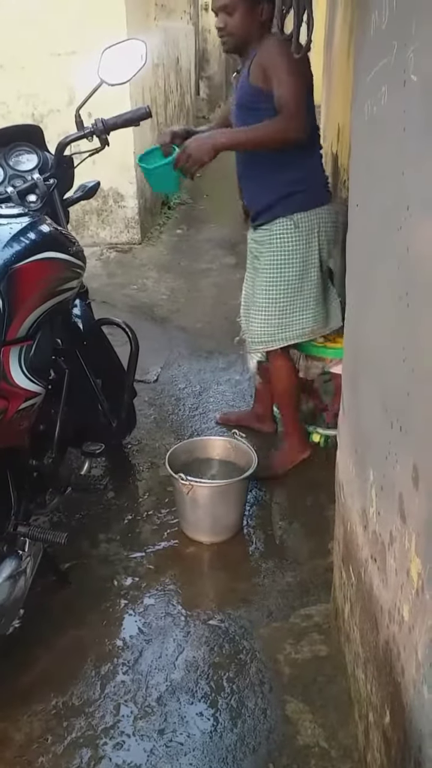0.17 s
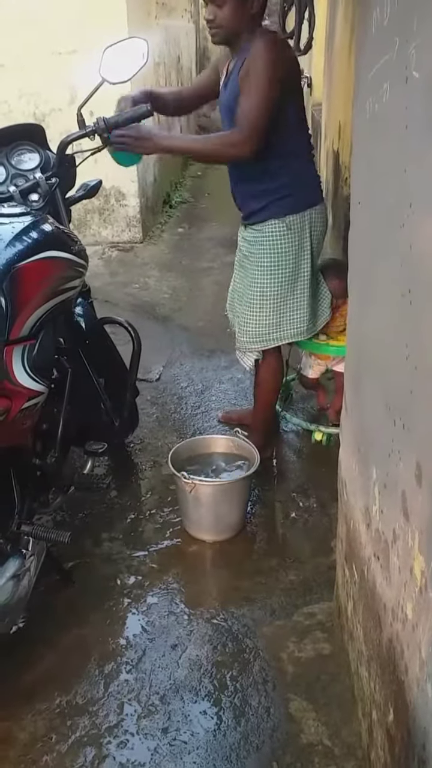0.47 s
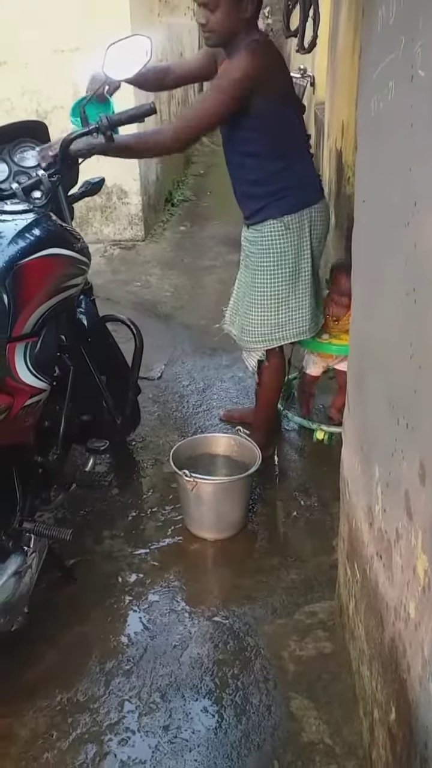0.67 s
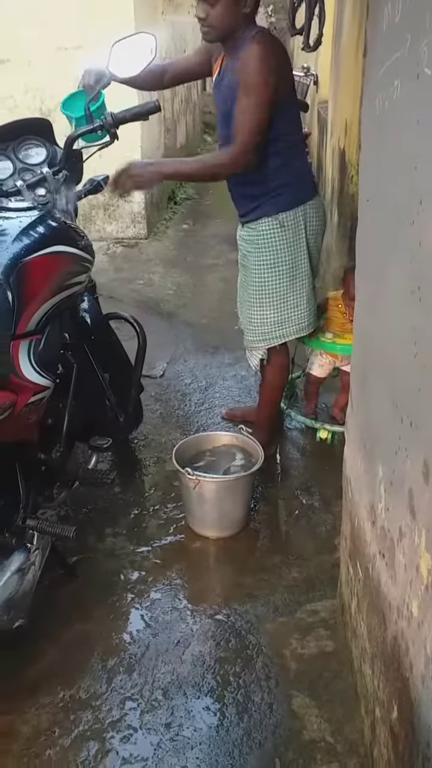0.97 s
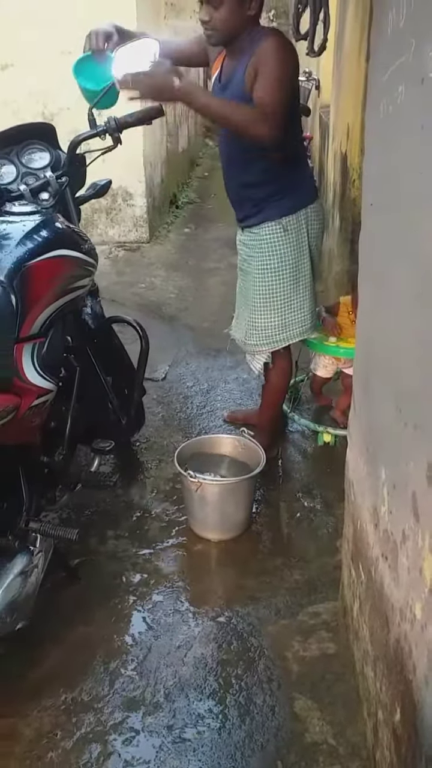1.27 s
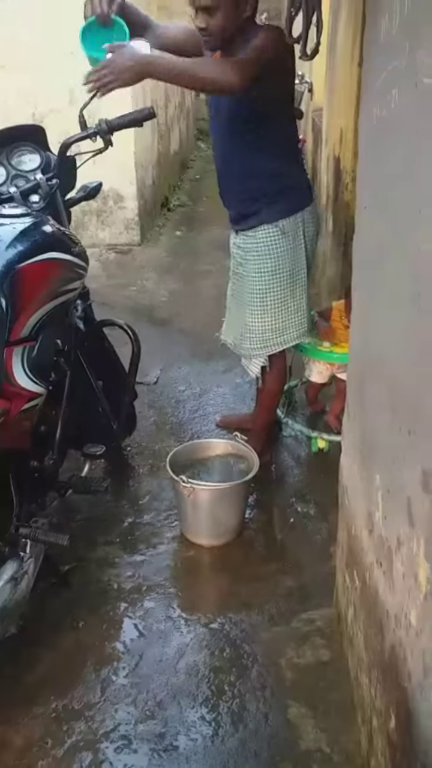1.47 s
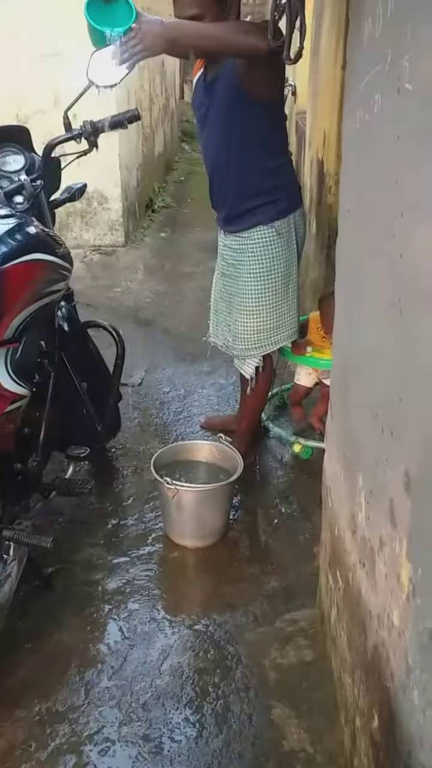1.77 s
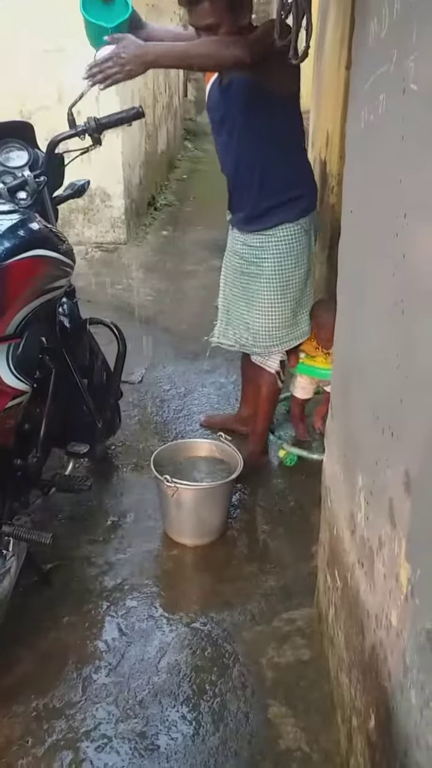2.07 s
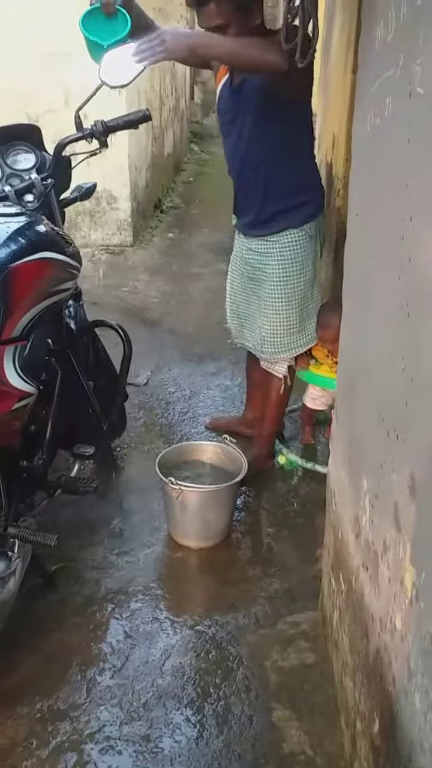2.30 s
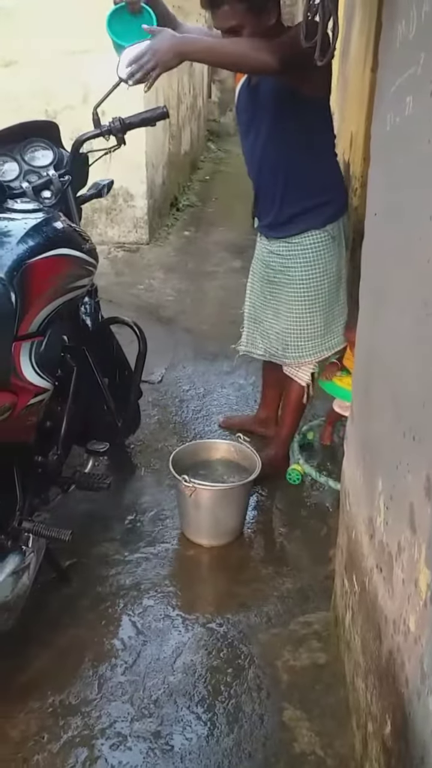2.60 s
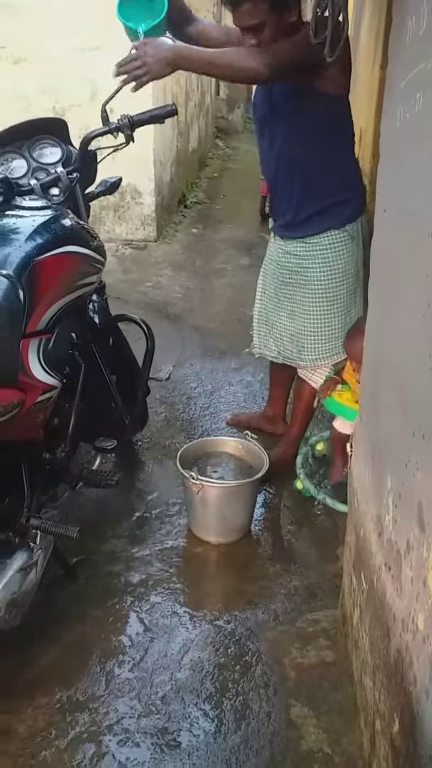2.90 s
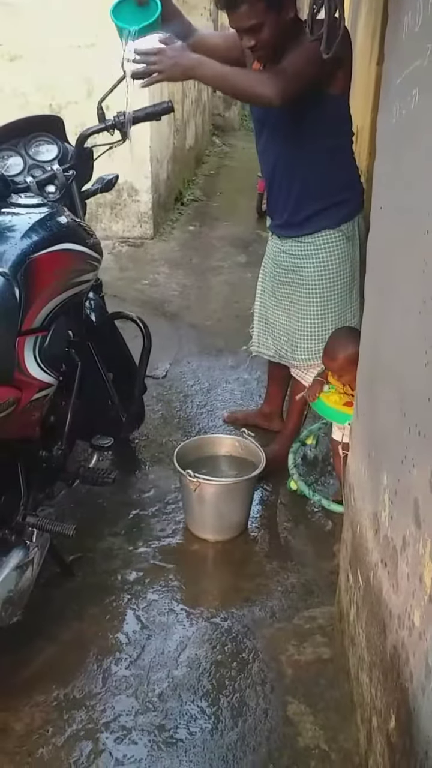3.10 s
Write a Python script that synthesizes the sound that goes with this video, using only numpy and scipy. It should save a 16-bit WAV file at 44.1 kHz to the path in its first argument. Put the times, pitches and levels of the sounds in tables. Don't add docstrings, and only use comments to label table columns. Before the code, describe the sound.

Close phone pickup of water poured over a motorcycle in a tight alley: faint spitting first, a plastic double knock with rattle, then dense bright splashes with wet rubbing, gurgles and short squeaks over a low murmur.

```python
import sys
import numpy as np
from scipy import signal
from scipy.fft import rfft, irfft, next_fast_len
from scipy.io import wavfile
from scipy.ndimage import map_coordinates

SR = 44100
rng = np.random.default_rng(int(sys.argv[2]) if len(sys.argv) > 2 else 0)


def natural_amplitude(level_db):
    exponent = np.asarray(level_db, float) / 20
    return 10 ** exponent


def store_pcm(level_fs):
    pcm = np.round(np.clip(level_fs, -1, 1) * 32767).astype(np.int16)
    wavfile.write(sys.argv[1], SR, np.atleast_2d(pcm).T)


N = 143325


def unit(x):
    return x / np.sqrt(np.mean(x ** 2) + 1e-20)


def along(points, hz):
    f, v = np.transpose(points)
    return np.interp(np.log(hz + 1), np.log(f + 1), v)


def wobble(knots_per_s, size=N):
    knots = rng.standard_normal(int(size * knots_per_s / SR) + 4)
    return map_coordinates(knots, [np.arange(size) * knots_per_s / SR])


def filtered(x, response):
    m = next_fast_len(len(x) + 2048)
    return irfft(rfft(x, m) * response(np.fft.rfftfreq(m, 1 / SR)), m)[:len(x)]


def add(track, start_s, sound):
    part = track[max(round(start_s * SR), 0):][:len(sound)]
    part += sound[:len(part)]


def swell(length_s, rise_share):
    u = np.linspace(0, 1, max(round(length_s * SR), 8))
    return np.clip(np.minimum(u / rise_share, (1 - u) / (1 - rise_share)) * 4.539, 0, 1)


# freq_hz, density_db_per_hz
STREET_SPECTRUM = [(18, -55), (30, -1.5), (239, 2), (303, 2.5), (486, 0), (721, 4), (1630, -23.5),
                   (3770, 3.5), (16000, -53)]
# peak_s, peak_db, pitch_hz
THUDS = [(0.125, -41.5, 321.7), (0.199, -40.5, 345.6), (0.239, -33, 372.5), (0.289, -47.5, 325.9),
         (0.335, -41, 407.1), (0.365, -40, 309.5), (0.469, -40.5, 317.3), (0.517, -39, 300.2),
         (0.641, -39.5, 320.6), (0.698, -40, 369), (0.984, -39, 365), (1.144, -47.5, 305.2),
         (1.189, -40, 312.6), (1.34, -41, 289.1), (1.412, -34, 306.8), (1.538, -37.5, 316.9),
         (1.593, -37, 303.5), (1.751, -41.5, 329.9), (1.923, -42, 319.1), (1.96, -39, 340),
         (2.051, -36.5, 320.8), (2.509, -41, 359.7), (2.605, -44.5, 293.6), (2.635, -35, 296),
         (2.866, -39.5, 338.5), (3.141, -37.5, 390.4)]


def street():
    level_db, rise_db_per_s = -50.5, 2
    hum_hz, hum_width_hz, hum_db = 322.18, 112.38, -53
    thud_db, thud_rise_s, thud_t60_s = 9.5, 0.0059386, 0.07952

    def hollow(f):
        damping = 1j * f * hum_width_hz
        return (damping / (hum_hz ** 2 - f * f + damping)) ** 2

    murmur = unit(filtered(rng.standard_normal(N), lambda f: natural_amplitude(along(STREET_SPECTRUM, f))))
    murmur *= natural_amplitude(level_db + rise_db_per_s * np.arange(N) / SR + 0.641 * wobble(6.4634))
    out = murmur + natural_amplitude(hum_db) * unit(filtered(rng.standard_normal(N), hollow))
    t = np.arange(SR // 10) / SR
    for peak_s, db, hz in THUDS:
        envelope = natural_amplitude(db + thud_db - 60 * t / thud_t60_s) * (1 - np.exp(-t / thud_rise_s)) ** 2
        add(out, peak_s - thud_rise_s, envelope * np.sin(2 * np.pi * hz * t))
    return out


# freq_hz, t60_s
ALLEY_DECAY = [(300, 0.4794), (2000, 0.18982), (6000, 0.09191), (15000, 0.25513)]


def alley(x):
    tail_db, delay_s = -3, 0.0017
    out, step = np.zeros(N), SR // 10
    for at in range(0, N, step):
        hz, t, z = signal.stft(rng.standard_normal(SR // 3), SR, nperseg=128)
        decay = natural_amplitude(-60 * t / along(ALLEY_DECAY, hz)[:, None])
        tail = signal.istft(z * decay, SR, nperseg=128)[1]
        tail /= np.linalg.norm(tail)
        add(out, at / SR + delay_s, natural_amplitude(tail_db) * signal.fftconvolve(x[at:at + step], tail))
    return out


# start_s, peak_db
KNOCK_EVENTS = [
    (.779, -17),
    (.786, -12),
    (.814, -21),
    (.858, -24),
]
# freq_hz, level_db, t60_s, rise_s
SHELL_MODES = [(378, 7, .16, .009), (507.43, -8.5, 0.1354, 0.00183), (517, -9, 0.3752, 0.00611),
               (590, 0, .035, 0.000627), (716, -4.5, 0.05244, 0.000841), (830.05, -8, 0.09187, 0.001657),
               (1353.8, 0, .03, 0.00052)]


def walker():
    rattle_hz, rattle_db, rattle_t60_s = 900, -8, 0.5615
    body_hz, body_db, body_t60_s = 549.8, -5.5, 0.2564

    def rattle_band(f):
        low_cut = (f / rattle_hz) ** 2 / (1 + (f / rattle_hz) ** 2)
        return low_cut / (1 + (f / 4500) ** 3)

    def body_band(f):
        return 1 / (1 + (1.683 * (f / body_hz - body_hz / (f + 1))) ** 4)

    out, t = np.zeros(N), np.arange(SR // 3) / SR
    onset = 1 - np.exp(-t / 0.00141)
    for start_s, db in KNOCK_EVENTS:
        ring = np.zeros(len(t))
        for hz, level_db, t60_s, rise_s in SHELL_MODES:
            envelope = natural_amplitude(level_db - 60 * t / t60_s) * (1 - np.exp(-t / rise_s))
            ring += envelope * np.sin(2 * np.pi * hz * (start_s + t))
        loose = rng.standard_normal((2, len(t))) * natural_amplitude(2.5 * wobble(203, len(t)))
        rattle = natural_amplitude(rattle_db - 60 * t / rattle_t60_s) * unit(filtered(loose[0], rattle_band))
        body = natural_amplitude(body_db - 60 * t / body_t60_s) * unit(filtered(loose[1], body_band))
        add(out, start_s, natural_amplitude(db - 9.5) * (ring + onset * (rattle + body)))
    return out


# start_s, length_s, first_hz, last_hz, level_db
SQUEAK_EVENTS = [(0.584, 0.13935, 2800, 2753, -48.5), (0.725, 0.0317, 3525, 3559, -42),
                 (.985, 0.01678, 3977, 4266, -39), (1.352, 0.0455, 3200, 2018, -38),
                 (2.096, 0.02898, 3800, 3933, -33.5), (2.015, .015, 1384, 1455, -47),
                 (2.3, .04, 2350, 1850, -42), (3.125, 0.049, 2400, 2726, -43.5),
                 (0.447, 0.04622, 6050, 6034, -53), (0.853, 0.0196, 1373, 1541, -34.5),
                 (0.863, 0.02179, 1135, 1013, -31.5), (1.411, 0.02569, 1296, 1360, -41.5),
                 (1.572, 0.0197, 1494, 1280, -41), (1.839, 0.022415, 835.7, 774.9, -31),
                 (1.966, 0.02619, 610.7, 680.3, -34.5), (2.106, 0.01874, 1381, 1313, -37),
                 (2.259, 0.04423, 1482, 1263, -36), (2.301, 0.05167, 1201, 815.2, -36.5),
                 (2.479, 0.014935, 1600, 1699, -37.5), (2.695, 0.03149, 316.3, 343, -37.5),
                 (3.006, 0.058, 1350, 1170, -39)]


def squeaks():
    slip_jitter, slip_db, rasp_db, overtone_db = 0.015, 3, -6, -9
    out = np.zeros(N)
    for start_s, length_s, first_hz, last_hz, db in SQUEAK_EVENTS:
        shape = np.hanning(round(length_s * SR)) ** 0.2395
        size = len(shape)
        hz = np.linspace(first_hz, last_hz, size) * (1 + slip_jitter * wobble(115.77, size))
        phase = 2 * np.pi * np.cumsum(hz) / SR
        rasp = natural_amplitude(rasp_db) * wobble(260, size)
        tone = np.sin(phase) * (1 + rasp) + natural_amplitude(overtone_db) * np.sin(2 * phase)
        add(out, start_s, natural_amplitude(db + 4 + slip_db * wobble(133.16, size)) * shape * tone)
    return out


# start_s, length_s, pitch_hz, level_db
GURGLE_EVENTS = [(.195, 0.06705, 1289, -55.5), (.33, 0.05585, 1268, -52), (0.407, 0.06063, 707, -43),
                 (0.46, 0.1151, 1965, -51.5), (0.566, 0.05896, 716, -41), (1.359, 0.05388, 900, -46),
                 (1.551, 0.03661, 751.8, -49), (2.0, 0.14656, 822.9, -47.5), (2.201, 0.12854, 573.9, -46),
                 (2.8, 0.0802, 759, -53.5), (2.499, 0.06022, 355.6, -41.5), (2.559, 0.12366, 757.4, -41.5),
                 (2.85, 0.05944, 197.8, -49), (2.6, 0.0254, 720.6, -41)]


def gurgles():
    q = 3.381
    out = np.zeros(N)
    for start_s, length_s, hz, db in GURGLE_EVENTS:
        shape = swell(length_s, 0.0982)
        noise = rng.standard_normal(len(shape))
        band = filtered(noise, lambda f: 1 / (1 + (q * (f / hz - hz / (f + 1))) ** 2))
        add(out, start_s, natural_amplitude(db) * shape * unit(band))
    return out


# start_s, length_s, level_db, tilt_db_per_octave
WIPE_EVENTS = [
    (.46, 0.03637, -44, 4),
    (0.628, 0.06069, -43, -5.5),
    (0.738, 0.03545, -38, -5.5),
    (1.359, 0.06655, -40, 5.5),
    (1.739, 0.03345, -40, -0.5),
    (1.932, 0.04569, -32.5, 5),
    (2.848, 0.05702, -33, -1.5),
    (2.989, 0.04439, -37, 4.5),
    (3.133, 0.03883, -39.5, -1.7152),
    (3.2, 0.0762, -56.5, 4.5),
]
# freq_hz, density_db_per_hz
RUB_SPECTRUM = [(35, -43), (60, -20), (672, 1), (897, -3), (4730, -6), (12000, -57.5), (15600, -41),
                (22000, -120)]


def wipes():
    out = np.zeros(N)
    for start_s, length_s, db, tilt_db in WIPE_EVENTS:
        shape = swell(length_s, 0.421)
        rub = rng.standard_normal(len(shape)) * natural_amplitude(0.7466 * wobble(251.18, len(shape)))

        def tilted(f):
            return natural_amplitude(along(RUB_SPECTRUM, f) + tilt_db * np.log2(f / 1500 + 0.2063))

        add(out, start_s, natural_amplitude(db) * shape * unit(filtered(rub, tilted)))
    return out


# time_s, spray_db
POUR_FLOW = [(0, -45.5), (.3, -47.5), (.6, -47), (1.0, -42.5), (1.345, -43.5), (1.4, -30.5), (1.58, -41.5),
             (1.66, -41.5), (1.8, -39), (1.95, -35.5), (2.25, -32.5), (2.5, -33.5), (2.62, -35),
             (2.758, -40.5), (2.86, -31), (3.0, -41), (3.1, -50), (3.25, -39)]
# freq_hz, density_db_per_hz
MIST_SPECTRUM = [(710, -55), (1200, -2.5), (2980, -1.5), (3740, -5.5), (4650, 3), (15000, -11.5),
                 (16000, -3.5)]


def spray():
    grains_per_s, grain_db, spread_db, mist_db = 1100, -8, 3.5, -4
    center_hz, pitch_octaves, decay_cycles, clump_db = 5201, 0.8627, 0.52225, 3
    count, blip_len = 4000, np.arange(128)
    draws, pitch = rng.random((count, 3)), rng.standard_normal(count)
    gaps_s = -np.log(1 - draws[:, 0]) / grains_per_s
    at = (np.cumsum(gaps_s) * SR).astype(int)
    size = natural_amplitude(np.minimum(-spread_db * np.log(1 - draws[:, 1]), 10))
    hz = np.clip(center_hz * 2 ** (pitch_octaves * pitch), 3000, 15500)
    cycles = hz[:, None] * blip_len / SR
    envelope = np.exp(-cycles / decay_cycles) * (1 - np.exp(-cycles * 2))
    blips = size[:, None] * envelope * np.sin(2 * np.pi * cycles)
    grains = np.bincount((at[:, None] + blip_len).ravel(), blips.ravel(), N)[:N]
    grains = unit(grains) * natural_amplitude(clump_db * wobble(27.488))
    mist = unit(filtered(rng.standard_normal(N), lambda f: natural_amplitude(along(MIST_SPECTRUM, f))))
    mist *= natural_amplitude(2.9935 * wobble(20))
    time_s, flow_db = np.transpose(POUR_FLOW)
    flow = natural_amplitude(np.interp(np.arange(N) / SR, time_s, flow_db))
    return flow * (natural_amplitude(grain_db) * grains + natural_amplitude(mist_db) * mist)


# peak_s, peak_db, pitch_hz, hiss_db
SINGLE_DROPS = [(1.273, -17, 8236, 0.5), (1.5682, -13.5, 4557, -21), (1.6629, -12, 4533, -33.5),
                (1.6981, -8, 8118, -1.5), (1.8166, -17.5, 5207, -7.5), (1.8605, -24, 4716, -4),
                (1.8769, -17.5, 4249, 3), (2.0401, -17.5, 11360, -3), (2.0466, -15.5, 5971, -11.5),
                (2.0697, -7.5, 3844, -28.5), (2.1544, -15.5, 2026, -29.5), (2.1555, -12, 3324, 3),
                (2.169, -11.5, 4387, -11), (2.2058, -14, 4768, -1.5), (2.2264, -12.5, 8067, -18.5),
                (2.328, -13.5, 8566, -12), (2.3285, -20, 5532, -31.5), (2.329, -21, 3000, -30),
                (2.2268, -23.5, 2581, -29.5), (2.3968, -8, 2628, -10.5), (2.398, -9.5, 4341, -30),
                (2.4615, -11, 4535, -23), (2.538, -14, 4745, -25), (2.6633, -8, 7686, -34.5),
                (2.7745, -20.5, 6090, 0.5), (2.8356, -12.5, 4169, -26.5), (2.839, -14.5, 2904, -30),
                (3.1436, -19, 2900, -20)]
# peak_s, peak_db, pitch_hz, hiss_db
BROKEN_GOUTS = [(.0927, -33.5, 5049, 1), (.192, -27.5, 2923, -20.5), (.3157, -30.5, 2782, -22),
                (1.1319, -28.5, 4997, -1), (1.1538, -25.5, 4240, -17.5), (1.458, -22.5, 2413, -30),
                (1.4905, -16, 2812, -30), (1.9035, -17.5, 8143, -11.5), (1.9344, -16.5, 4085, -22),
                (1.9455, -20.5, 8930, -8), (1.9967, -28, 4495, -3), (2.5924, -29, 9000, 9.5),
                (2.8004, -25, 4653, -8.5), (0.3377, -23.5, 2689, -30.5), (0.8085, -28, 8200, -20.5),
                (1.388, -13, 4526, -19), (1.3997, -19, 5347, 8.5), (1.457, -11, 4209, -22),
                (1.492, -14.5, 4559, -26), (1.5184, -14.5, 3363, -14), (1.5435, -17, 8042, -11),
                (1.5602, -16, 4310, -18), (1.589, -20.5, 5183, 3), (1.6307, -21.5, 4788, -8),
                (1.7579, -16.5, 4954, -20), (1.927, -14.5, 4271, -24), (2.1053, -17.5, 3803, -15.5),
                (2.2413, -13, 5967, -1), (2.363, -28, 4618, 9.5), (2.452, -13, 4385, -29),
                (2.4942, -17, 3185, 2.5), (2.7005, -11, 4485, -22.5), (2.8144, -17, 5490, -8),
                (2.9396, -24.5, 4326, 3), (2.9929, -20.5, 3027, -2), (3.0525, -23, 6942, -1),
                (3.155, -34.5, 2545, -3.5)]
# ring_share, splash_share, rise_s, splash_t60_s
DROP_SHAPE = (1.8133, 0.5868, 0.0019365, 0.025861)
GOUT_SHAPE = (1, 0.56072, 0.0028015, 0.036463)


def drops(events, ring, splash, rise_s, splash_t60_s):
    ring_cycles, level_db, hiss_gain_db, hiss_t60_ratio = 3.0657, 1, 5.5, 0.36567
    out, t = np.zeros(N), np.arange(SR // 20) / SR
    onset = 1 - np.exp(-t / rise_s)
    for peak_s, db, hz, hiss_db in events:
        noise = rng.standard_normal((2, len(t))) * natural_amplitude(4.432 * wobble(479.6, len(t)))

        def splash_band(f):
            return (f / hz) ** 3 / np.abs(1 - (f / hz) ** 2 + .9j * f / hz) ** 2

        envelope = (1 - np.exp(-t * hz)) ** 2 * np.exp(-t * hz / ring_cycles)
        slap = ring * envelope * np.sin(2 * np.pi * hz * t)
        droplets = splash * unit(filtered(noise[0], splash_band)) * natural_amplitude(-60 * t / splash_t60_s)
        hiss = unit(filtered(noise[1], lambda f: 1 / (1 + (8500 / (f + 1)) ** 6)))
        hiss *= natural_amplitude(hiss_db + hiss_gain_db - 60 * t / (hiss_t60_ratio * splash_t60_s))
        add(out, peak_s - .0004, natural_amplitude(db + level_db) * (slap + onset * (droplets + hiss)))
    return out


def scene():
    palm_send_db, walker_send_db = -9, -12
    water = drops(SINGLE_DROPS, *DROP_SHAPE) + drops(BROKEN_GOUTS, *GOUT_SHAPE) + spray()
    palm = squeaks() + gurgles() + wipes()
    knocks = walker()
    tail = alley(water + natural_amplitude(palm_send_db) * palm + natural_amplitude(walker_send_db) * knocks)
    return (water + palm + knocks + tail + street())[None]


def band_limit(x):
    return signal.sosfilt(signal.butter(12, 16810, fs=SR, output="sos"), x)


def record(dry):
    low_hz, top_hz = 61.16, 15900
    dip_hz, dip_width_hz, dip_db = 9599.3, 790.4, -4.5

    def microphone(f):
        dip = natural_amplitude(dip_db * np.exp(-((f - dip_hz) / dip_width_hz) ** 2))
        return dip * (f < top_hz) / (1 + (low_hz / (f + 1)) ** 4)

    return band_limit(filtered(dry[0], microphone)[None])


dry = scene()
out = record(dry)
store_pcm(out)
```